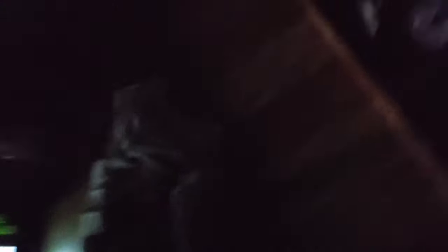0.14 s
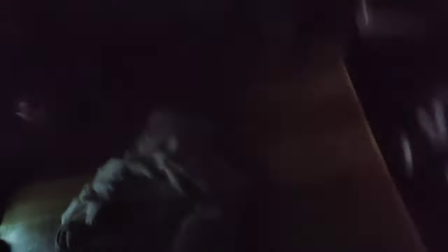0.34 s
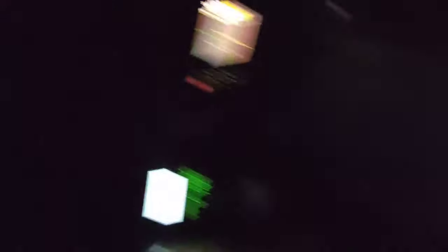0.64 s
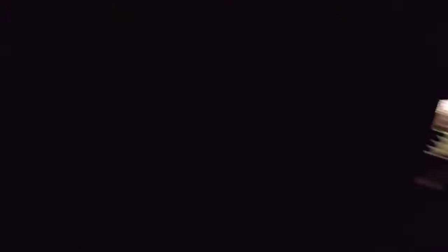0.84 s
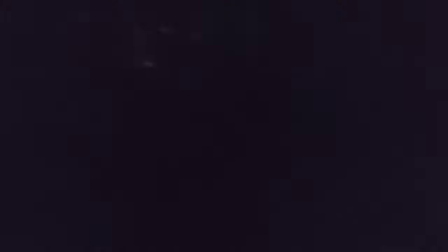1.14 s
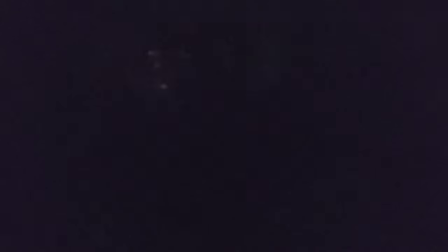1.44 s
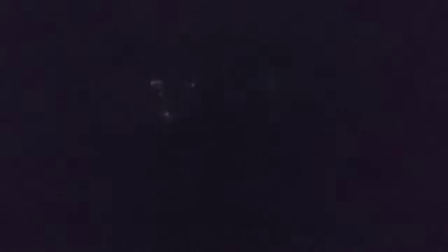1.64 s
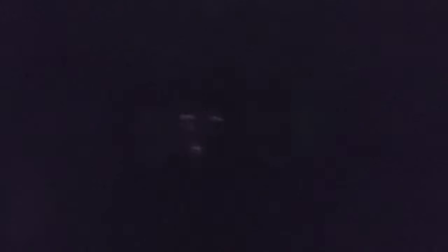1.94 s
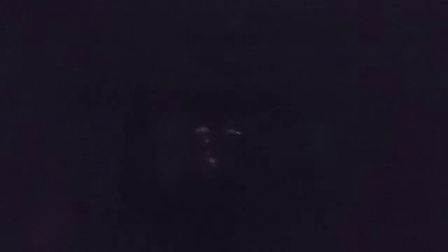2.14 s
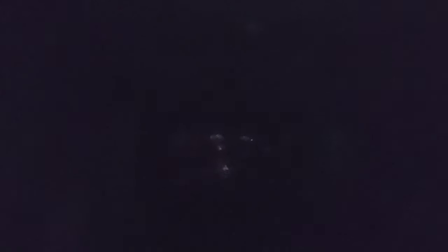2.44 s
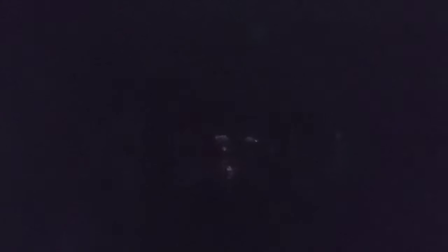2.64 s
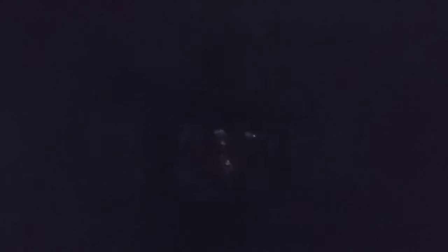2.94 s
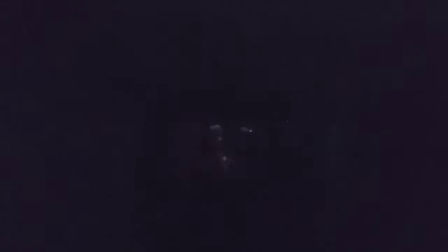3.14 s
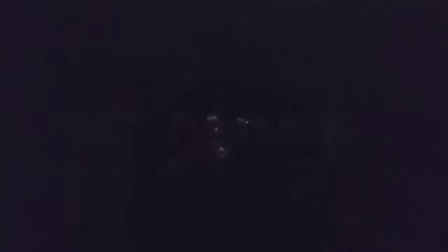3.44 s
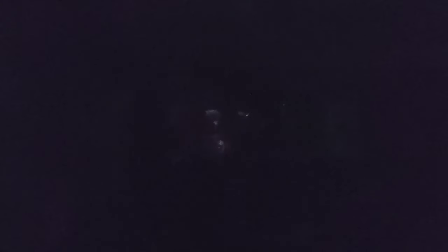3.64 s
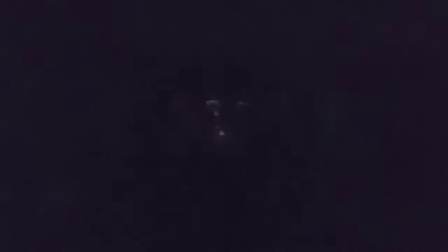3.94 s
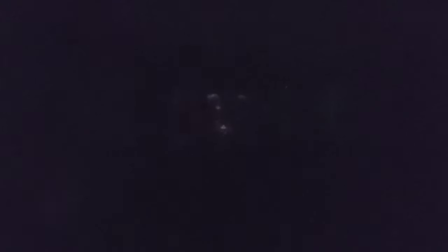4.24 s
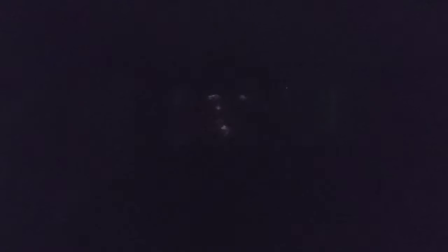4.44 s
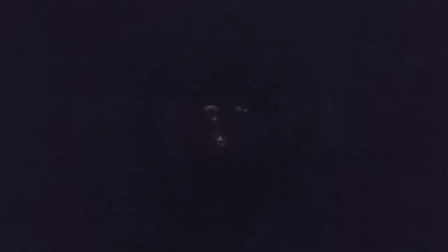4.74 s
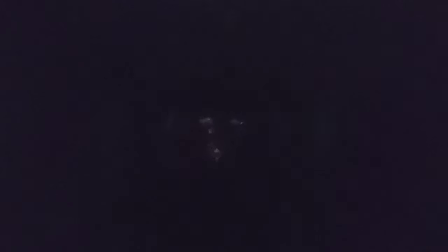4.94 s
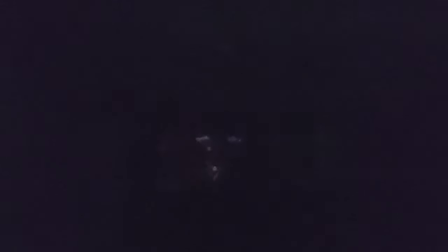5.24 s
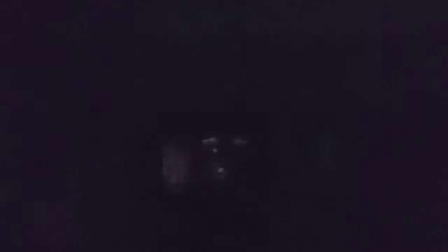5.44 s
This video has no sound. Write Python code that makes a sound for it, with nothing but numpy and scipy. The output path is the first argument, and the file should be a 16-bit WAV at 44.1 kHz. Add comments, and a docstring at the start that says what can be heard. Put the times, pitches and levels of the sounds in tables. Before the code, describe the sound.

Heard on deck, a cruising boat's diesel throbs with low rhythmic knocks, a rising and falling drone, clatter and faint hiss.

```python
"""A deep, chugging drone: the six-cylinder diesel of a fishing boat, heard on deck as it cruises.
The exhaust pulses make the drone, which swells and fades as the boat rides the waves. Three blows
in each engine cycle knock harder than the rest. The firings also make the hull rumble, the engine
block clatter and loose fittings rattle. Above that, gears whine, a turbocharger whistles thinly and
intake air hisses. Over the first two seconds the rattle drops back and the treble opens up."""
import sys
import numpy as np
from scipy import signal
from scipy.fft import rfft, irfft
from scipy.io import wavfile
from scipy.ndimage import uniform_filter1d

SR = 44100
rng = np.random.default_rng(int(sys.argv[2]) if len(sys.argv) > 2 else 0)


def wav_out(sig):
    """Save sig, one row per channel (or a flat mono array), as 16-bit PCM at SR to the path in sys.argv[1]."""
    wavfile.write(sys.argv[1], SR, np.round(np.clip(np.atleast_2d(sig).T, -1, 1) * 32767).astype(np.int16))


N = 246959
TIME = np.arange(N) / SR
FREQS_HZ = np.fft.rfftfreq(N, 1 / SR)

# Engine speed, sagging a little on the waves. Each row: time in seconds, engine cycles per second.
ENGINE_SPEED = [(0, 9.785), (.9, 9.778), (1.5, 9.815), (2, 9.812), (2.6, 9.79), (3.35, 9.826), (3.85, 9.77),
                (4.4, 9.78), (5.6, 9.825)]
# The drone swelling with the waves. Each row: time in seconds, relative level in dB.
DRONE_SWELL = [(0.0, -20), (0.33, -22.5), (0.39, -33), (.6, -28), (0.87, -19), (1.34, -20), (1.51, -31),
               (1.67, -18.5), (2.2, -20.5), (2.28, -24), (2.36, -17), (2.55, -18), (2.75, -13.5),
               (2.9, -15.5), (2.97, -21), (3.2, -22), (3.55, -42), (3.85, -35), (4.13, -23.5), (4.4, -21),
               (4.76, -13), (4.93, -19), (5.0, -29), (5.21, -35), (5.3, -21), (5.46, -26.5), (5.55, -24),
               (5.6, -28)]
# A lower boom that comes and goes as the boat rolls. Each row: time in seconds, relative level in dB.
BOOM_SWELL = [(0, -46), (.43, -31), (.72, -25), (1.45, -27.5), (2, -38), (2.85, -46), (3.13, -40),
              (4.6, -29), (4.99, -52), (5.4, -25), (5.6, -22)]
# Engine tones that rise or fall early on. Each row: multiple of the cycle rate, left and right base
# level in dB, flutter in dB, extra dB before the change, middle and length of the change in seconds.
CHANGING_TONES = [(13, -42, -38, 3, -10, 1.7, .5), (18, -44, -48, .6, 18, .85, .55),
                  (24, -49, -46, 1.5, 8, .9, .5), (26, -45, -43, 1.5, 2, .9, .5),
                  (30, -55, -53, 1.5, 11, .5, .4), (72, -47.5, -31.5, 1.3, -12, 1.2, 1.3)]
# Lasting engine tones. Each row: multiple of the cycle rate, left and right base level in dB.
STEADY_TONES = [(6, -45, -45), (11, -50, -46), (16, -48, -45), (20, -46, -43), (22, -48, -44),
                (23, -52, -48), (42, -52, -48), (54, -50, -50), (56, -48, -52), (63, -48, -50),
                (68, -54, -47)]
# The three hard blows. Each row: place in the cycle from 0 to 1, pitch in Hz, base peak level in dB.
HARD_BLOWS = [(.985, 108, -19), (.205, 112, -22.5), (.44, 135, -21.5)]
# Strength of those blows as the boat works in the waves. Each row: time in seconds, gain in dB.
BLOW_STRENGTH = [(0, -7), (.5, -6), (.8, -2.5), (1.4, -0.5), (2.8, -2), (3.4, 1), (3.8, -4), (4.2, -2.5),
                 (5.1, -3), (5.6, -3.5)]
# Rumble of hull and exhaust pipe. Each row: frequency in Hz, left and right base level in dB per Hz.
HULL_SPECTRUM = [(20, -61, -59), (40.4, -74, -76), (56, -49.5, -50.5), (75.4, -46.5, -52),
                 (91.5, -50, -51.5), (144.3, -46.5, -41.5), (170, -48.5, -64), (209, -63, -51.5),
                 (339, -56, -64.5), (344, -51.5, -51.5), (396, -58.5, -56.5), (680, -55, -56.5),
                 (732, -60.5, -58.5), (1070, -64, -64.5)]
# Bands of the growl that churn on their own. Each row: low edge in Hz, high edge in Hz.
GROWL_BANDS = [(300, 390), (390, 490), (490, 600), (600, 680)]
# The deepest rumble rising and falling. Each row: time in seconds, gain in dB.
DEEP_SWELL = [(0, -5), (1.2, 3), (2.2, -5), (3, 0), (4, 3), (4.7, -1), (5.3, 4)]
# The growl near 480 Hz shifting between the sides. Each row: time in seconds, left and right push
# in dB (only part of the push takes effect).
GROWL_SWING = [(0, 16, 14), (.8, -2, -5), (1.35, 4, 12), (2, 8, -4), (3.5, 4, 1), (4.6, 3, 0), (5.6, 10, 6)]
# Clatter of the engine block. Each row: frequency in Hz, left and right base level in dB per Hz.
BLOCK_SPECTRUM = [(1200, -66, -66.5), (1480, -65.5, -68), (1910, -63, -68.5), (1780, -60, -64),
                  (2190, -67, -76), (2420, -59.5, -75.5), (2650, -65, -78), (3020, -68.5, -73),
                  (3390, -74, -80), (4020, -80, -84.5)]
# Panels and covers that ring on the engine. Each row: pitch in Hz, width in Hz, boost in dB.
ENGINE_PANELS = [(1536, 11, 8.5), (2070, 155, 5.5), (2214, 66, 8), (2610, 39, 4.5), (2810, 98, 3),
                 (3310, 46, 5)]
# The clatter's treble opening up. Each row: time in seconds, gain on the left in dB.
TREBLE_OPENING = [(0, -6), (.45, -7.5), (.6, -5.5), (.85, -7), (1.02, -4), (1.6, -3.5), (2, -1.5),
                  (5.6, -1)]
# Loose fittings. Each row: pitch in Hz, width of the ring in Hz, relative level in dB.
LOOSE_FITTINGS = [(863, 54, 5), (976, 52, -3), (1430, 80, 0), (1500, 56, -2.5), (1970, 60, -9),
                  (2070, 60, -13), (2470, 100, -4)]
# Their rattle dying down. Each row: time in seconds, relative level in dB.
RATTLE_FADE = [(0, -41.5), (.7, -42.5), (1.3, -42), (2.1, -50), (5.6, -58)]
# Loud gear tones. Each row: multiple of the rate at which teeth meet, left and right base level in dB.
LOUD_GEAR_TONES = [(11, -44.5, -57), (12, -45, -57), (13, -44, -56)]
# Faint gear tones. Each row: multiple of that same rate, left and right base level in dB.
FAINT_GEAR_TONES = [(6, -57, -53), (23, -61, -68), (24, -65, -69), (26, -63, -65), (27, -60, -67),
                    (29, -55, -64), (30, -57, -64), (31, -59, -70)]
# Swells of the loud gear tones. Each row: time in seconds, then a gain in dB for each of the three.
GEAR_SWELLS = [(0, -18, -16, -14), (.45, -1, -4, -14), (.62, -3, 7, -8), (.85, -6, -8, -1),
               (1.02, 3, 5.5, 3.5), (1.5, -7, -4, 5), (1.78, 3, 5.5, -7), (2, 7.5, -4, 3),
               (2.55, -2, 8, -9), (3, 6.5, -13, 2.5), (3.5, 0, 0, 6.5), (4.25, 5, 3, -4), (4.7, 4.5, -2, 4),
               (5.05, 6, 6, 5.5), (5.6, 2, 6, 11.5)]
# Turbocharger tones. Each row: multiple of the shaft pitch, left and right base level in dB.
TURBO_TONES = [(1, -69, -74), (2, -52, -57.5), (3, -65, -63), (4, -64, -71)]
# Swells of those tones. Each row: time in seconds, then a gain in dB for each of the four.
TURBO_SWELLS = [(0, 3, -6, -3, -14), (.7, 3, 0, -1, -10), (1.75, -5, -2, 4, -10), (2, 7, -1, -1, 0),
                (2.25, 10, 2.5, -2, -1), (2.85, 8, 5, 1, 0), (3.2, 7, -1, -3, 2), (3.8, 7, 2, -7, 2),
                (4.3, 4, 0, -3, 4), (4.9, -4, -2, -2, -4), (5.2, -3, 3, -11, -2), (5.6, 0, 4, -5, -2)]
# Hiss of the intake air. Each row: frequency in Hz, left and right base level in dB per Hz.
AIR_SPECTRUM = [(4140, -79, -87), (5370, -77, -85.5), (6300, -74.5, -83), (6960, -75.5, -81),
                (7600, -93, -78.5), (8370, -82, -76.5), (9160, -114, -82), (10200, -84, -87.5),
                (11000, -92.5, -92.5), (13000, -94, -94), (15000, -89.5, -106.0)]
# How alike the noise is left and right. Each row: frequency in Hz, likeness (1 same, 0 unrelated).
STEREO_LIKENESS = [(20, 1), (70, 0.86), (140, 1), (280, 0.71), (500, 0.78), (900, 0.061), (1500, -0.12),
                   (15000, -0.18)]


def exhaust(cycles, drone_multiple=12, boom_multiple=9, waver_db=4):
    """Firing pulses make tones at multiples of the cycle rate; drone and boom swell with the waves."""
    drone = np.sqrt(2) * np.sin(2 * np.pi * cycles * drone_multiple)
    boom = np.sqrt(2) * np.cos(2 * np.pi * cycles * boom_multiple)
    out = amp(drone_db() + np.array([[-1.4], [1.5]])) * drone  # a little louder on the right
    out += amp(curves(BOOM_SWELL) - 4.5) * boom
    for multiple, left_db, right_db, flutter_db, extra_db, change_s, fade_s in CHANGING_TONES:
        line = unit_level(amp(flutter_db * wander(11))) * tone(multiple * cycles)
        out += amp([[left_db], [right_db]]) * amp(extra_db * before(change_s, fade_s)) * line
    for multiple, *side_db in STEADY_TONES:
        waver = amp(waver_db * wander(4))
        line = tone(multiple * cycles + .0025 * multiple * wander(4))
        out += amp(side_db)[:, None] * unit_level(waver * line)
    return out


def knocks(cycles, rise_s=.005, spread_db=1.5):
    """Each hard blow makes the hull ring low and short; together they make the chug."""
    out, cycle_hz = np.zeros(N), curves(ENGINE_SPEED)[0]
    for place, hz, peak_db in HARD_BLOWS:
        blow_count = cycles - place + 2  # adding 2 keeps the count above zero
        age_s = blow_count % 1 / cycle_hz
        blow_db = peak_db + spread_db * rng.standard_normal(int(blow_count[-1]) + 1)
        rise = age_s / rise_s
        envelope = (rise * np.exp(1 - rise)) ** 2
        out += amp(blow_db[blow_count.astype(int)]) * envelope * np.sin(2 * np.pi * hz * age_s)
    return out * amp(curves(BLOW_STRENGTH))


def hull_rumble(cycles, churn_db=.33):
    """Each firing shakes the hull and exhaust pipe into a low, churning noise."""
    drive = shaking(cycles, repeat_share=.14) * firing(cycles, depth=.11, uneven_db=2.5)
    body = shape_noise(drive, HULL_SPECTRUM, 13, 1120) * amp(.68 * wander(14))
    for low_hz, high_hz in GROWL_BANDS:
        body = lift(body, churn_db * wander(6.9), low_hz, high_hz)
    body = lift(body, curves(DEEP_SWELL), 10, 62)
    body = lift(body, -4 * before(1.34, fade_s=.8), 100, 220)  # the upper rumble starts quieter
    return lift(body, curves(GROWL_SWING), 515, 453)  # crossed edges leave a weak, narrow band


def block_clatter(cycles, throb=.094):
    """Burning fuel and moving valves ring the engine block and its panels, throbbing once a cycle."""
    drive = shaking(cycles, repeat_share=.21) * firing(cycles, depth=.17, uneven_db=5.5)
    drive *= 1 + throb * np.sin(2 * np.pi * cycles)
    block = shape_noise(drive, BLOCK_SPECTRUM, 1104, 5100)
    panel_db = sum(db / (1 + (2 * (FREQS_HZ - hz) / width) ** 2) for hz, width, db in ENGINE_PANELS)
    ringing = irfft(rfft(block) * amp(panel_db), N)
    treble_db = curves(TREBLE_OPENING) * np.array([[1], [.1]])  # the right side barely changes
    return lift(ringing, treble_db, 2020, 8900)


def rattle(cycles, spread_db=5, skip_chance=.5):
    """Loose fittings tap at some of the firings, each ringing at its own pitch."""
    firings = np.flatnonzero(np.diff(np.floor(cycles * 6)))
    age_s, out = TIME[:SR // 8], np.zeros((2, N))
    for hz, width, db in LOOSE_FITTINGS:
        taps = np.zeros(N)
        at = np.minimum(firings + rng.integers(0, SR // 200, len(firings)), N - 1)  # up to 5 ms late
        taps[at] = amp(spread_db * rng.standard_normal(len(at))) * (rng.random(len(at)) > skip_chance)
        ring = np.exp(-np.pi * width * age_s) * np.array([tone(hz * age_s), tone(hz * age_s)])
        out += amp(db) * unit_level(signal.oaconvolve(taps[None], ring)[:, :N])
    out = unit_level(irfft(rfft(out) * band(700, 2800), N))
    return out * amp(curves(RATTLE_FADE) + np.array([[1.5], [-3]]))  # louder on the left


def gear_whine(cycles, teeth_per_cycle=20, flicker_db=2.6):
    """Gear teeth meet and whine; the slack between them blurs the tones, the high ones most."""
    meetings = teeth_per_cycle * cycles + .008 * wander(8)
    out = np.zeros((2, N))
    swells_db = list(curves(GEAR_SWELLS)) + [0] * len(FAINT_GEAR_TONES)
    for (multiple, *side_db), swell_db in zip(LOUD_GEAR_TONES + FAINT_GEAR_TONES, swells_db):
        slack = multiple * (.0095 * wander(20) + .005 * wander(70))
        line = amp(flicker_db * wander(14)) * tone(multiple * meetings + slack)
        out += amp(side_db)[:, None] * amp(swell_db) * unit_level(line)
    return out


def turbo_whistle(shaft_hz=3424, drift_hz=5, fray_hz=10, slow_waver_db=2.2, flicker_db=4):
    """The spinning turbocharger whistles; its pitch drifts with the load and is frayed by the airflow."""
    turns = np.cumsum(shaft_hz + drift_hz * wander(3) + fray_hz * wander(60)) / SR
    out = np.zeros((2, N))
    for (multiple, *side_db), swell_db in zip(TURBO_TONES, curves(TURBO_SWELLS)):
        waver_db = slow_waver_db * np.tanh(wander(5.4)) + flicker_db * wander(17)
        line = unit_level(amp(waver_db) * tone(multiple * turns))
        out += amp(side_db)[:, None] * amp(swell_db) * line
    return out * amp(-2.3)


def intake_hiss():
    """Air rushing into the engine makes a smooth hiss."""
    return shape_noise(rng.standard_normal((2, N)), AIR_SPECTRUM, 4860, 17000)


def shaking(cycles, repeat_share):
    """Engine vibration: part comes back alike in every cycle, the rest is fresh noise."""
    cycle_samples = round(SR * TIME[-1] / cycles[-1])
    pattern = signal.resample(rng.standard_normal((2, cycle_samples)), cycle_samples * 8, axis=1)
    alike = pattern[:, (cycles % 1 * pattern.shape[1]).astype(int)]
    return np.sqrt(repeat_share) * alike + np.sqrt(1 - repeat_share) * rng.standard_normal((2, N))


def firing(cycles, depth, uneven_db, cylinders=6):
    """A gain with one rounded bump each time a cylinder fires; the cylinders differ in strength."""
    blows = cycles * cylinders
    cylinder_db = uneven_db * unit_level(rng.standard_normal(cylinders))
    strength = amp(cylinder_db[blows.astype(int) % cylinders])
    return 1 + depth * strength * np.sin(np.pi * np.sqrt(blows % 1)) ** 2


def drone_db():
    """The drone's smoothed level at every sample."""
    return uniform_filter1d(curves(DRONE_SWELL), size=2000) - 1.7


def amp(db):
    """Turns decibels into a number to multiply by."""
    return 10 ** (np.asarray(db) / 20)


def unit_level(x):
    """Scales a signal to an average power of 1."""
    return x / np.sqrt(np.mean(x ** 2, axis=-1, keepdims=True) + 1e-20)


def curves(rows):
    """Joins the rows of a time table with straight lines, one curve per column."""
    seconds, *columns = np.transpose(rows)
    return np.array([np.interp(TIME, seconds, c) for c in columns])


def spectra(rows):
    """Fills in between the rows of a frequency table, one curve per column."""
    hz, *columns = np.transpose(rows)
    return np.array([np.interp(np.log(FREQS_HZ + 1), np.log(hz + 1), c) for c in columns])


def before(change_s, fade_s):
    """Slides from 1 to 0 over fade_s seconds, passing halfway at change_s."""
    return np.clip(.5 + (change_s - TIME) / fade_s, 0, 1)


def wander(rate_hz):
    """A smooth random wobble, about 1 in size, moving at up to roughly rate_hz."""
    return unit_level(irfft(rfft(rng.standard_normal(N)) / (1 + (FREQS_HZ / rate_hz) ** 4), N))


def tone(turns):
    """A sine wave of power 1 that starts at a random point in its swing."""
    return np.sqrt(2) * np.sin(2 * np.pi * (turns + rng.random()))


def band(low_hz, high_hz):
    """A gain for each frequency, dropping steeply outside the two edges."""
    return 1 / np.sqrt((1 + (low_hz / (FREQS_HZ + 1)) ** 24) * (1 + (FREQS_HZ / high_hz) ** 24))


def lift(x, db, low_hz, high_hz):
    """Turns one band up or down over time; a very narrow band gets only part of the change."""
    return x + (amp(db) - 1) * irfft(rfft(x) * band(low_hz, high_hz), N)


def shape_noise(white, table, low_hz, high_hz):
    """Gives two white noises a table's spectrum and makes left and right alike in the bass."""
    left, other = rfft(unit_level(white))
    likeness = spectra(STEREO_LIKENESS)[0]
    pair = np.array([left, likeness * left + np.sqrt(1 - likeness ** 2) * other])
    return irfft(pair * band(low_hz, high_hz) * amp(spectra(table)), N) * np.sqrt(SR / 2)


def scene():
    """Mixes the boat's sounds; one count of engine cycles keeps all but whistle and hiss in step."""
    cycles = np.cumsum(curves(ENGINE_SPEED)[0]) / SR
    cycles -= np.interp(.045, TIME, cycles)  # the first full cycle starts at 0.045 seconds
    swell_db = drone_db() - drone_db().mean()
    hull = hull_rumble(cycles) * amp(-.023 * swell_db)  # gives way a little as the drone swells
    # The deck's hollow boom near 274 Hz is strongest at the start and also gives way to the drone.
    hollow_db = 6.5 * before(1.2, fade_s=1.8) ** 2 - .046 * swell_db
    low = lift(exhaust(cycles) + knocks(cycles) + hull, hollow_db, 274, 273)
    # The highest sounds are duller on the left for about two seconds.
    dull_db = before(1.88, fade_s=.36) * np.array([[-4.5], [0]])
    high = lift(intake_hiss() + gear_whine(cycles) + turbo_whistle(), dull_db, 4400, 20000)
    return low + block_clatter(cycles) + rattle(cycles) + high


def record(dry):
    """Softens both ends and cuts the treble above 15400 Hz."""
    soft = dry * signal.windows.tukey(N, .001)
    low_pass = signal.firwin(511, 15400, window=("kaiser", 9), fs=SR)
    return signal.oaconvolve(soft, low_pass[None], "same")


dry = scene()
out = record(dry)
wav_out(out)
```